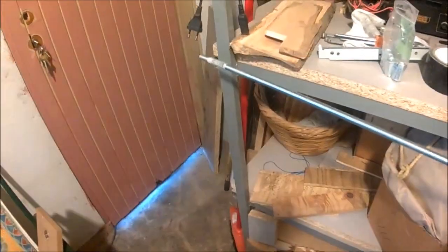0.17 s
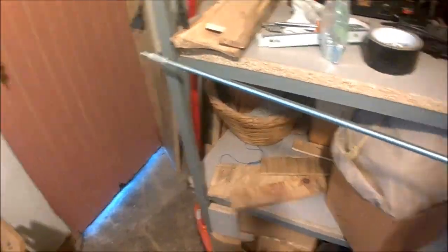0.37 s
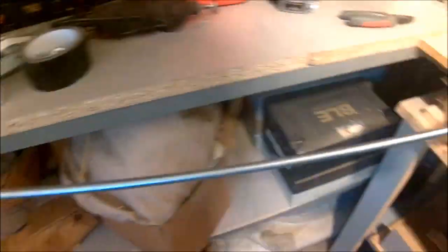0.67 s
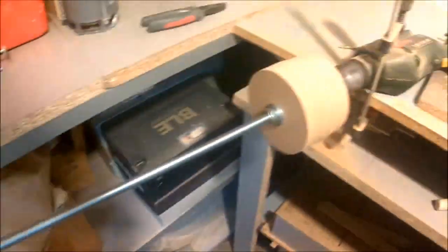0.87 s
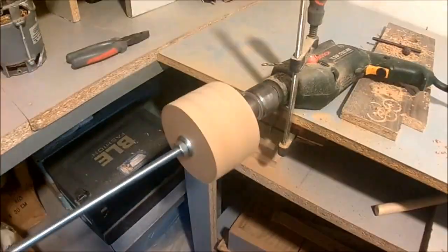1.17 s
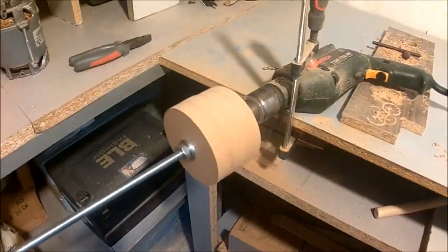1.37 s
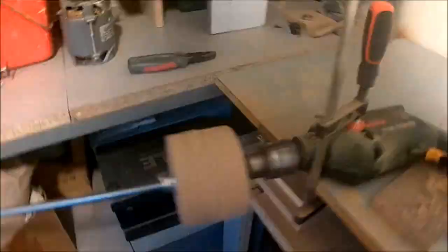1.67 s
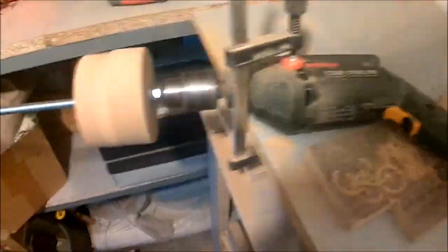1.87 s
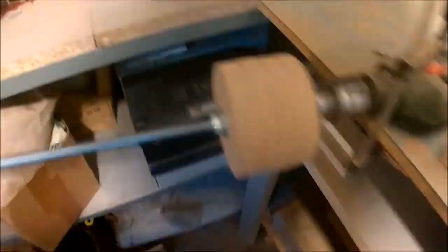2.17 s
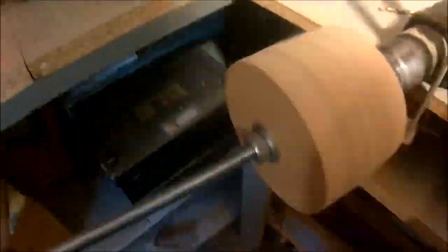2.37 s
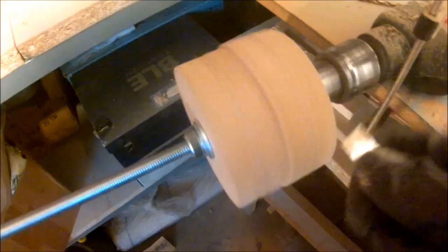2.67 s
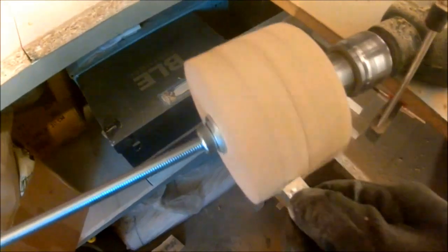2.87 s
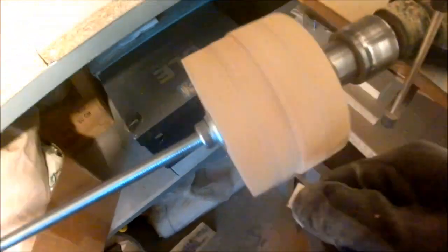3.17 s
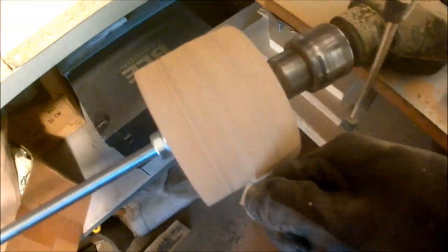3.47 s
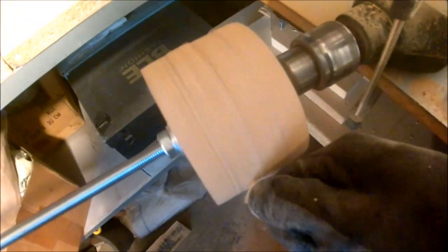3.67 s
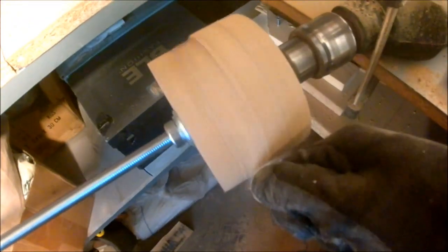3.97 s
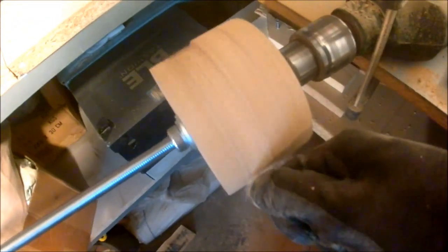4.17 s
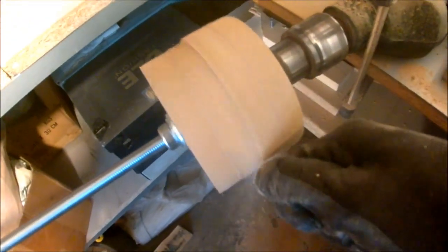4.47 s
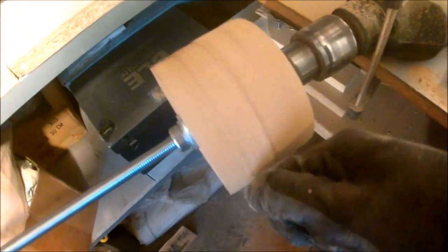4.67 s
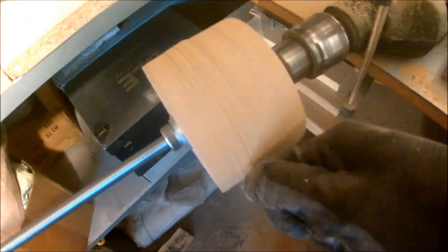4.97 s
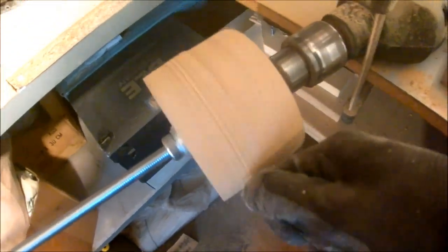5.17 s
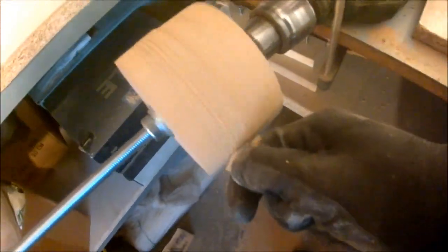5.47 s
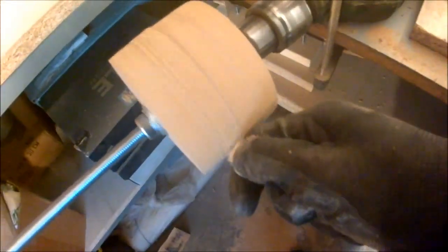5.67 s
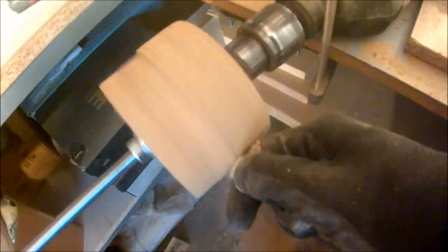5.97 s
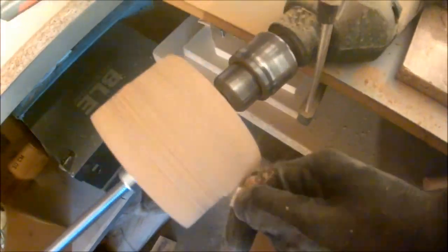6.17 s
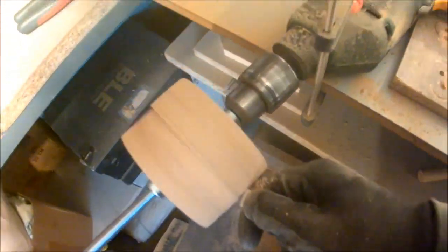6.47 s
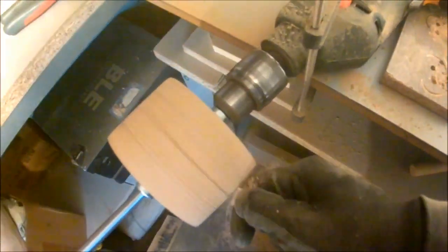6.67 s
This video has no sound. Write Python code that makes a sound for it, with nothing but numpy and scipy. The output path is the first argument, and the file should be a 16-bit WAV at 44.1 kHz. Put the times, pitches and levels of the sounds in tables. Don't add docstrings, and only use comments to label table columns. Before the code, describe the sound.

Already running at the start, a drill gives a dense, nasal, buzzing noise with fixed high whines and thin airy hiss. As the handheld microphone swings close, its tone shifts and strengthens, with a short click on the way. Then sandpaper touches the turning wood, one long rasp followed by three shorter ones, blended into the roar. Close, gritty, small-room sound with slight crackly dropouts and no ending.

```python
import sys
import numpy as np
from scipy import signal
from scipy.fft import rfft, irfft, next_fast_len
from scipy.io import wavfile
from scipy.ndimage import uniform_filter1d, minimum_filter1d

SR = 44100
rng = np.random.default_rng(int(sys.argv[2]) if len(sys.argv) > 2 else 0)


def int16_out(signal):
    q = np.round(np.clip(np.atleast_2d(signal).T, -1, 1) * 32767)
    wavfile.write(sys.argv[1], SR, q.astype(np.int16))


def volts(x):
    e = np.asarray(x, float) / 20
    return 10 ** e


N = 300223
T = np.arange(N) / SR
HUM_HZ = 199.862
NEAR_BEND = 3.24

# (time [s], roar level [dB], nearness to the blank [0-1], facing the fan vents [0-1])
CAMERA = [(0.0, -22.5, 0, 0.2), (0.4, -23, 0.07, 0.57), (0.72, -23, 0.04, 0.34), (0.95, -20.5, 0.24, 0.26),
          (1.5, -21, 0.28, 0.2), (1.8, -20.5, 0.64, 0.38), (2.2, -20.0, 0.52, 0.3), (2.36, -19, 0.53, 0.24),
          (2.52, -20, 0.69, 1.0), (3.2, -20.5, 0.82, 0.88), (3.5, -21, 0.87, 0.33),
          (3.8, -20.5, 0.86, 0.17), (4.5, -20.5, 0.83, 0.06), (5.2, -20.5, 0.83, 0.2),
          (5.5, -19.6, 0.82, 0.3), (5.9, -19.5, 0.82, 0.26), (6.5, -19.5, 0.84, 0.52),
          (6.81, -19, 0.87, 0.0)]
POSE_TIMES = [.33, .62, 1.2, 2.15, 2.8, 3.85, 4.65, 5.55, 6.5]
# (level re roar [dB], change when near [dB], when facing [dB])
ROAR_BANDS = [(-18.5, 9.5, 0.7), (-2, 0.6, -4.5), (-5.5, -2.85, 2.5), (-9.5, 1.66, 2.5)]
# (level re roar [dB], change when near [dB], when facing [dB])
HISS = (-30, 4.2, 3.1)
# (frequency [Hz], density [dB per Hz])
TOP_SHAPE = [(4240, -0.5), (7200, 0.5), (7630, -25), (8270, -9.5), (9690, -15), (10400, -10.5),
             (11200, -11.5), (12200, -10), (13400, -16.5), (15600, -21.5)]
# (start [s], length [s], scratch level [dB])
STROKES = [
    (3.496, 1.64, -52),
    (5.397, 0.2, -56),
    (5.75, 0.39, -53),
    (6.2, 0.8, -57),
]


def roar():
    # (frequency [Hz], density [dB per Hz])
    roar_shape = [(530, -64), (900, -25), (1130, -21), (1440, -10), (1690, -11.5), (1750, -5), (2090, -7),
                  (2630, -5.5), (3190, -1.5), (3770, -5), (4670, -5.5), (5070, -5.5), (5560, -3.5),
                  (6040, -9), (8200, -26.5), (10700, -73), (18000, -120)]
    band_edges = [2300, 3700, 5000]
    hz, t, power = posed(roar_shape, ringing(), comb_db=2.33)
    a, b, patches = rng.standard_normal((len(t), 513, 3)).T
    patches = uniform_filter1d(patches, size=6, axis=1)
    patches = evened(uniform_filter1d(patches, size=20, axis=0))
    band = np.searchsorted(band_edges, hz)
    want_db = np.array([heard(t, *row, NEAR_BEND) for row in ROAR_BANDS])
    have_db = [10 * np.log10(power[band == k].sum(0)) for k in range(4)]
    trim_db = uniform_filter1d((want_db - have_db)[band], size=9, axis=0)
    z = (a + 1j * b) * np.sqrt(power) * volts(trim_db + 0.79 * patches)
    flutter = volts(0.68 * drift(45.) + 0.32 * drift(20.0))
    flutter *= volts(.65 * np.cos(2 * np.pi * HUM_HZ * T))
    return volts(1.0) * flutter * signal.istft(z, nperseg=1024, noverlap=768)[1][:N]


def ringing():
    # (frequency [Hz], width [Hz], level [dB])
    reflections = [
        [(3072, 40, 6.5), (3290, 50, -5), (3880, 70, -1), (4740, 87, -2)],
        [(2734, 46, 0.5), (3050, 83, 1.5), (3580, 35, 1.5), (5640, 26, -3)],
        [(2740, 96, -3), (3360, 78, 3), (3623, 51, 5.5)],
        [(3295, 75, 1.5), (5530, 290, -7)],
        [(3130, 84, -3), (3440, 94, 2), (5150, 73, -2.5), (5360, 92, -1)],
        [(3440, 42, 1.5), (4330, 120, -2), (5840, 24, -14)],
        [(3153, 32, 3), (3470, 60, -4)],
        [(3150, 220, -1.5), (3450, 36, -1), (4480, 90, -4)],
        [(2884, 81, 4), (3800, 44, -32), (4270, 58, 4)],
    ]
    # (frequency [Hz], width [Hz], level from afar [dB], change when near [dB])
    housing = [(1840, 15, -17, 10.5), (2200, 23, -12, -8.5), (2654, 30, -13, 12), (4010, 58, 1.5, -11.5),
               (4680, 108, -5, 4.5), (5410, 47, -8.5, 3), (6160, 53, -27.5, 16)]
    near = column(CAMERA, POSE_TIMES, order=2)
    return [pose + [(hz, w, db + near_db * n) for hz, w, db, near_db in housing]
            for pose, n in zip(reflections, near)]


def motor_tones():
    pose_tones = [(-69, -48.5, -47.5, -50, -60), (-66.5, -51.5, -46, -43, -57),
                  (-63, -39.5, -37.5, -44, -39), (-59, -39, -45, -37.5, -40), (-69, -38, -52, -39.5, -37),
                  (-72, -37, -46, -38.5, -38.5), (-66, -39.5, -48, -36.5, -49),
                  (-65, -37.5, -45, -41.5, -34.5), (-75, -39.5, -50, -36, -39)]
    sway_db = (1.4, 1.7, 2.3, 1.3, 2.3)
    # (multiple of the hum [1], level re lowest roar band [dB])
    side_tones = [(6, -23), (8, -19), (10, -14), (12, -13), (14, -14), (15, -10), (16, -9), (17, -11),
                  (18, -10), (19, -10), (20, -11), (23, -14), (28, -12), (29, -14)]
    turn, out = 2 * np.pi * HUM_HZ * T, np.zeros(N)
    for i, k in enumerate((3, 9, 11, 13, 27)):
        level_db = np.interp(T, POSE_TIMES, np.transpose(pose_tones)[i]) + sway_db[i] * drift(3.08)
        out += volts(level_db) * np.sin(k * turn + 0.27 * drift(2.97) + 6 * rng.random())
    near_db = uniform_filter1d(heard(T, *ROAR_BANDS[0], NEAR_BEND), size=20000)
    for k, db in side_tones:
        fade_db = 2.2 * drift(2.5)
        out += volts(near_db + db + fade_db) * np.sin(k * turn + 0.4 * drift(3.025) + 6 * rng.random())
    rotor_hz, rotor_db = 450, -74
    out += volts(rotor_db) * np.clip(1.3 - T / 3, .6, 1) * np.sin(2 * np.pi * rotor_hz * T + drift(9.4))
    swing_s, swing_db, swing_half_s = 2.39, -11.5, 0.14
    swing = volts(swing_db * np.exp(-((T - swing_s) / swing_half_s) ** 2))
    return np.sqrt(2) * out * swing


def sandpaper():
    # (time [s], rotation rate [turns per s])
    spin = [
        (3.5, 45.73),
        (3.7, 47.27),
        (3.9, 44.66),
        (5.15, 42.9),
        (5.4, 49.36),
        (5.65, 37.86),
        (5.9, 44.46),
        (6.15, 36.9),
        (6.8, 42.13),
    ]
    # (frequency [Hz], level [dB])
    scratch_shape = [(150, -40), (800, -10), (2500, 16), (5000, 20), (8500, -1.5), (10500, -1.5),
                     (12500, -9.5), (13200, -17), (15600, -26)]
    rate = column(spin, T, order=1) * (T > spin[0][0])
    turns = np.cumsum(rate) / SR + 0.87 + 0.048 * drift(40.)
    strength = volts(1.5 * rng.standard_normal(400))[turns.astype(int)]
    u = turns % 1 / 0.078
    burst = strength * u * np.exp(-u) + .025
    grit = rng.standard_normal(N) * volts(3.9 * np.minimum(rng.exponential(1, N), 2.8))
    touch = np.clip((T - STROKES[0][0]) / 0.03, 0, 1)
    return volts(pressure_db() + 21.0) * touch * coloured(burst * grit, scratch_shape)


def pressure_db():
    ease_s, lifted_db = 0.029, -56
    held = [(db - lifted_db) * np.clip(np.minimum(T - s, s + length - T) / ease_s + .5, 0, 1)
            for s, length, db in STROKES]
    return lifted_db + np.max(held, axis=0)


def jolt_ring():
    # (start [s], frequency [Hz], level [dB], 60 dB decay time [s])
    modes = [
        (2.104, 4750, -16, 0.028),
        (2.11, 3150, -12.5, 0.1),
    ]
    out = np.zeros(N)
    for s, hz, db, t60 in modes:
        age = np.maximum(T - s, 0)
        attack = np.minimum(age / 0.0017, 1)
        out += volts(db - 60 * age / t60) * attack * np.sin(2 * np.pi * hz * age)
    return out


def jolts():
    # (start [s], level [dB], length [s])
    events = [
        (2.102, 6.5, 0.014),
    ]
    return volts(sum(db * (T > s) * np.clip((s + length - T) / 0.0096, 0, 1) for s, db, length in events))


def air():
    # (frequency [Hz], width [Hz], level [dB])
    vents = [
        [(7730, 56, 0), (9710, 78, -2), (10700, 47, -8)],
        [(8100, 47, -10), (10700, 64, 7), (12100, 110, -4)],
        [(8110, 190, 0), (10800, 66, -6), (11800, 240, -9)],
        [(8040, 120, 1), (10700, 130, 4), (12000, 310, 1)],
        [(9060, 200, 4), (10700, 96, 9), (11800, 230, 0)],
        [(9170, 220, -1), (9800, 72, 6), (11700, 150, 7)],
        [(10700, 100, -8), (11400, 240, -6)],
        [(7900, 260, -5), (8920, 77, 12), (9220, 44, -2)],
        [(10200, 230, -22), (11900, 270, -13)],
    ]
    softer = [[(f, w, db - 10.0) for f, w, db in pose] for pose in vents]
    hz, t, power = posed(TOP_SHAPE, softer, comb_db=2.7)
    a, b = rng.standard_normal((len(t), 513, 2)).T
    z = (a + 1j * b) * np.sqrt(power / power[hz > 8000].sum(0))
    chop = volts(1.4 * np.cos(2 * np.pi * HUM_HZ * T))
    return volts(heard(T, *HISS) - 3.0) * chop * signal.istft(z, nperseg=1024, noverlap=768)[1][:N]


def overload(x):
    # (frequency [Hz], density [dB per Hz])
    low_shape = [(20, -58), (30, -48), (70, -35), (120, -29.5), (250, -18.5), (500, -8), (1200, -3),
                 (1600, -5.5), (2600, -88)]
    # (level re roar [dB], change when near [dB], when facing [dB])
    rumble = (-42, 13.1, 1)
    flat = np.clip(x / np.sqrt(uniform_filter1d(x ** 2, size=8000)), -3.8, 3.8)
    low = coloured(flat ** 2 - 1 + 0.48 * rng.standard_normal(N), low_shape)
    low = low * volts(heard(T, *rumble) + 3.5) * jolts() ** 1.4
    top = coloured(flat ** 3, TOP_SHAPE) * volts(heard(T, *HISS) + 1.5)
    return low, top


def limited(x):
    knee = .31
    room = np.minimum(knee / abs(signal.hilbert(x, next_fast_len(N))[:N]), 1)
    return x * uniform_filter1d(minimum_filter1d(room, size=45), size=45)


def dropouts(held, low):
    # (time [s], treble change [dB], bass change [dB], length [ms])
    gaps = [(.032, -9, -9, 23), (.097, -11, -11, 22), (.287, -10, -7, 20), (0.5, -10, -12, 14),
            (.758, -5, -11, 13), (.905, -9, -9, 17), (1.589, -11, -4, 14), (3.465, -10, -11, 13),
            (3.764, -10, -12, 16), (4.223, -3, -8, 11), (4.532, -20, -19, 8.6), (4.822, -48, -26, 19),
            (5.066, -13, -7, 10), (5.196, -13, -9, 13), (5.687, -14, -15, 12), (6.498, -11, -3.5, 28),
            (5.536, -9, -7, 12),
    ]
    events = gaps

    def above(hz):
        return signal.oaconvolve(held, signal.firwin(255, hz, pass_zero=False, fs=SR), "same")

    treble, bass = above(7170.0), low + held - above(1430.0)
    holes = np.array([np.exp(-(abs(T - s) / (0.00054 * ms)) ** 3) for s, _, _, ms in events])
    top_db, low_db = 1.38 * np.transpose(events)[1:3] @ holes
    return held + low + treble * (volts(top_db) - 1) + bass * (volts(low_db) - 1)


def heard(t, db, near_db, facing_db, bend=1):
    near, facing = np.clip(column(CAMERA, t, order=2), 0, 1.2), column(CAMERA, t, order=3)
    return column(CAMERA, t, order=1) + db + near_db * near ** bend + facing_db * facing


def posed(shape, poses, comb_db):
    pose_hold = 1.3
    frames, hz = N // 256 + 5, np.fft.rfftfreq(1024, 1 / SR)
    t = np.arange(frames) * 256 / SR
    lift = [sum(volts(db) ** 2 / (1 + (2 * (hz - f) / w) ** 2) for f, w, db in pose) for pose in poses]
    base = volts(read(shape, hz)) ** 2
    share = np.array([np.interp(t, POSE_TIMES, row) for row in np.eye(len(poses))]) ** pose_hold
    share = share / share.sum(0)
    power = .5 * base[:, None] + np.transpose(lift) @ share * (base > 1e-7)[:, None]
    comb = rng.standard_normal((frames, 513)).T
    comb = uniform_filter1d(comb, size=110, axis=1)
    comb = evened(uniform_filter1d(comb, size=2, axis=0))
    return hz, t, power * volts(comb_db * comb) ** 2


def coloured(x, points):
    z = rfft(x, next_fast_len(N))
    z = z / np.sqrt(uniform_filter1d(abs(z) ** 2, size=1500))
    hz = np.arange(len(z)) * SR / 2 / (len(z) - 1)
    return evened(irfft(z * volts(read(points, hz)), next_fast_len(N))[:N])


def drift(top_hz):
    steps = rng.standard_normal(400)
    return np.interp(T * top_hz, np.arange(400), steps) * np.sqrt(1.5)


def evened(x):
    return x / np.sqrt(np.mean(x ** 2) + 1e-20)


def read(points, hz):
    f, value = np.transpose(points)
    return np.interp(np.log(hz + 1), np.log(f + 1), value, left=-120, right=-120)


def column(rows, t, order):
    rows = np.array(rows)
    return np.interp(t, rows[:, 0], rows[:, order])


def scene():
    noises = roar() + air() + sandpaper()
    return (noises * jolts() + jolt_ring() + motor_tones())[None]


def band_limit(x):
    return signal.sosfilt(signal.butter(12, 15710, fs=SR, output="sos"), x)


def record(dry):
    x = dry[0]
    low, top = overload(x)
    bass_cut = signal.butter(2, 350, "high", fs=SR, output="sos")
    held = 1.056 * signal.sosfilt(bass_cut, limited(x)) + top
    mix = dropouts(held, low)[None]
    return band_limit(mix)


dry = scene()
out = record(dry)
int16_out(out)
```